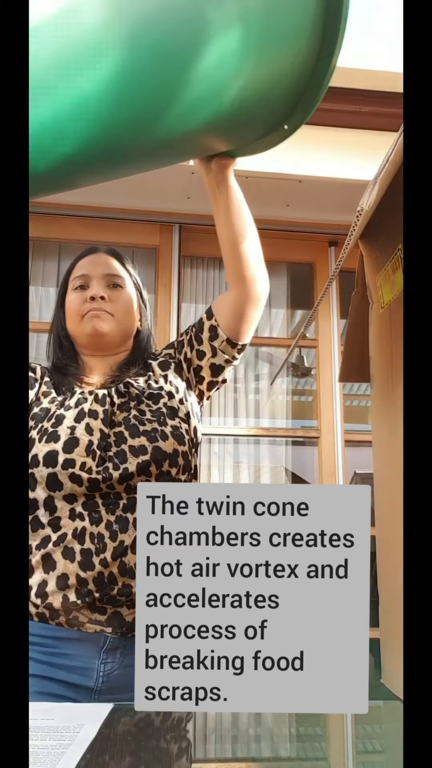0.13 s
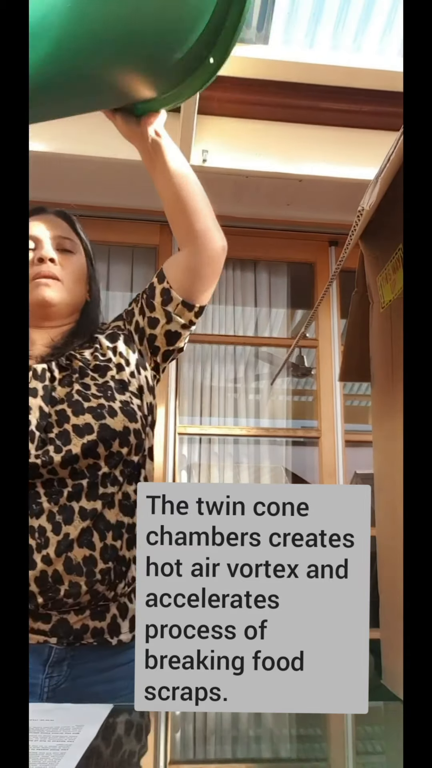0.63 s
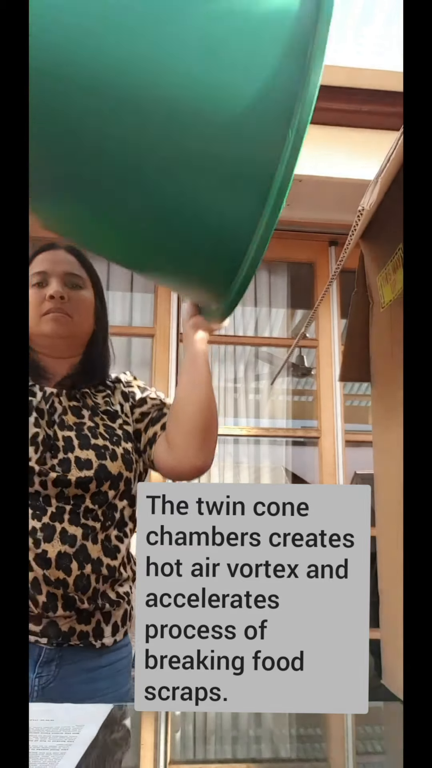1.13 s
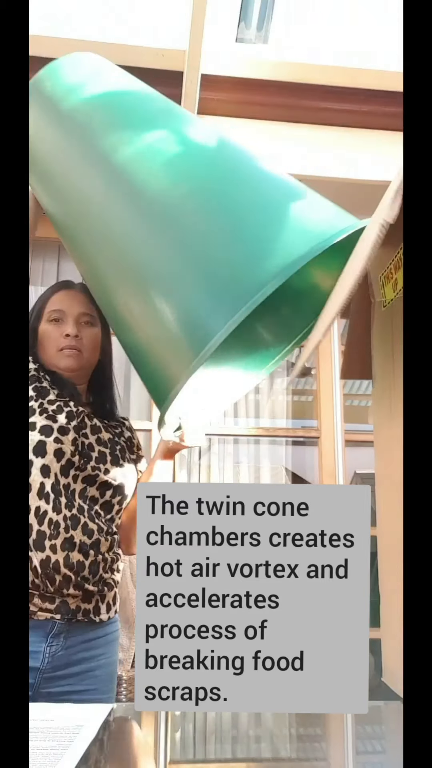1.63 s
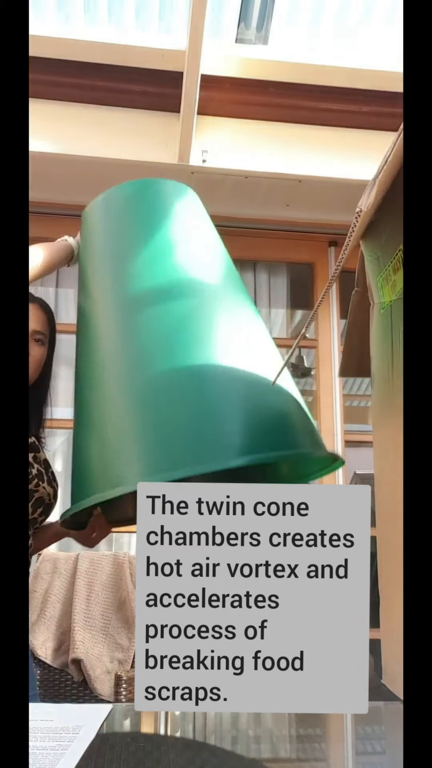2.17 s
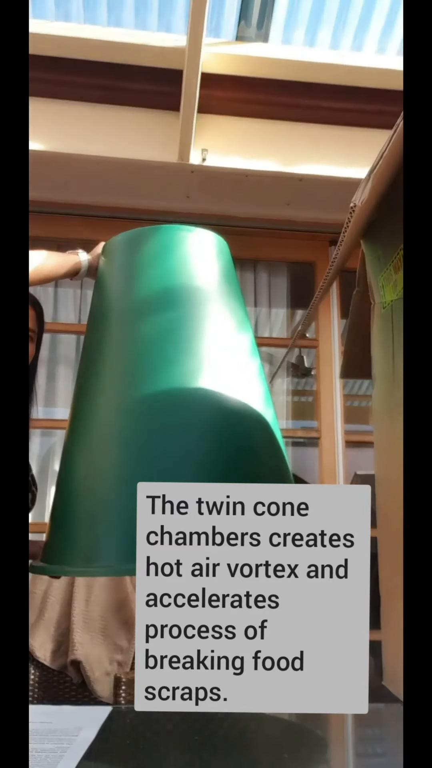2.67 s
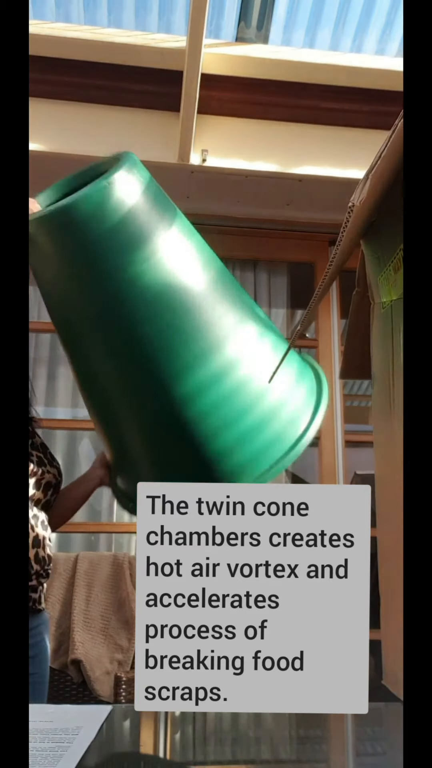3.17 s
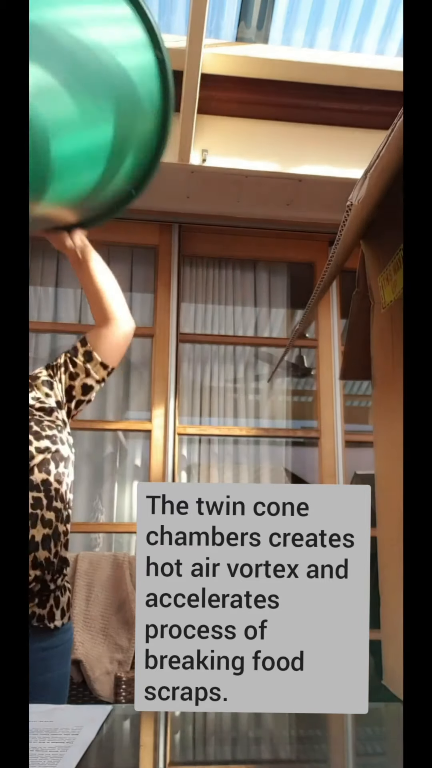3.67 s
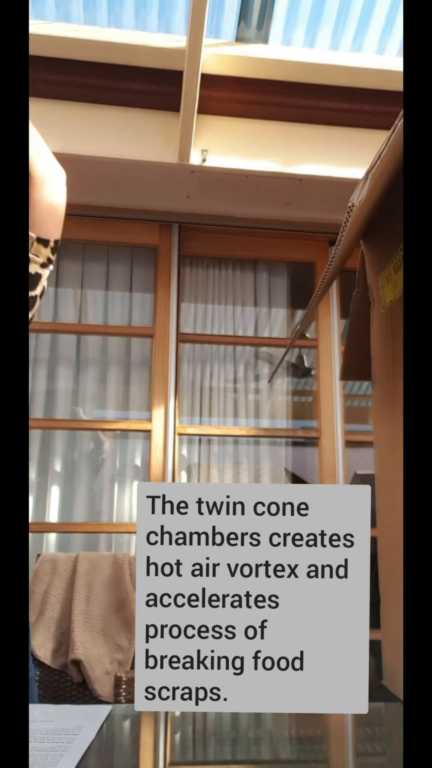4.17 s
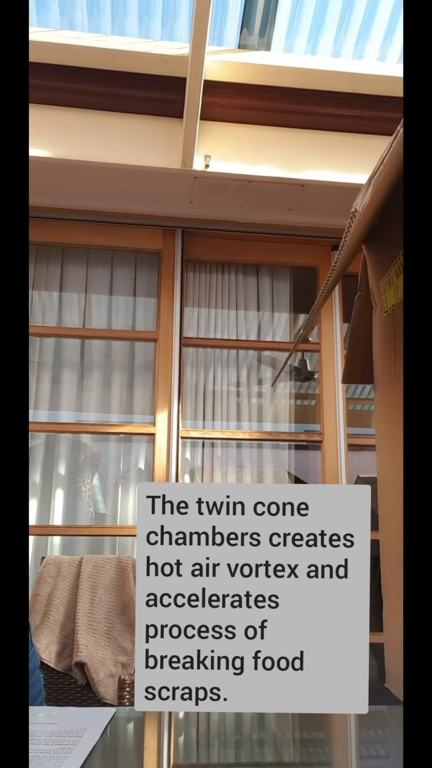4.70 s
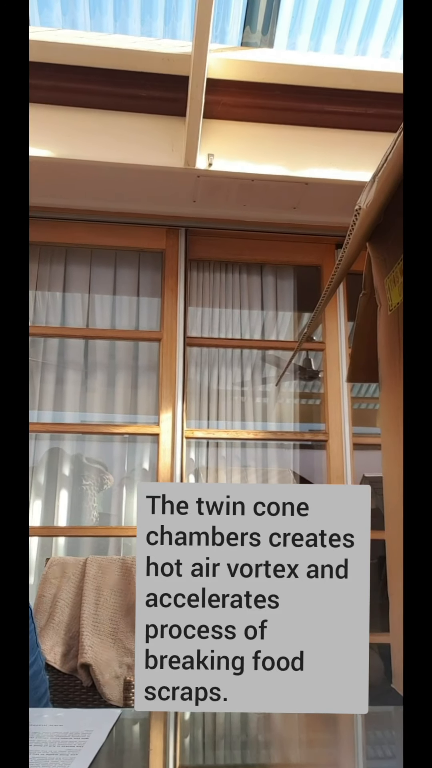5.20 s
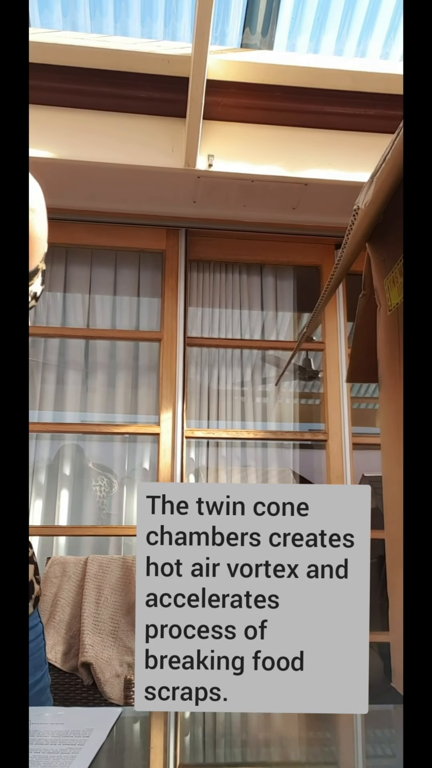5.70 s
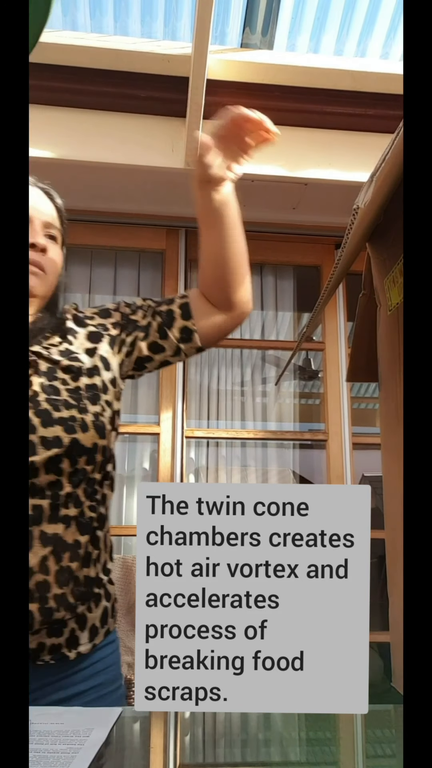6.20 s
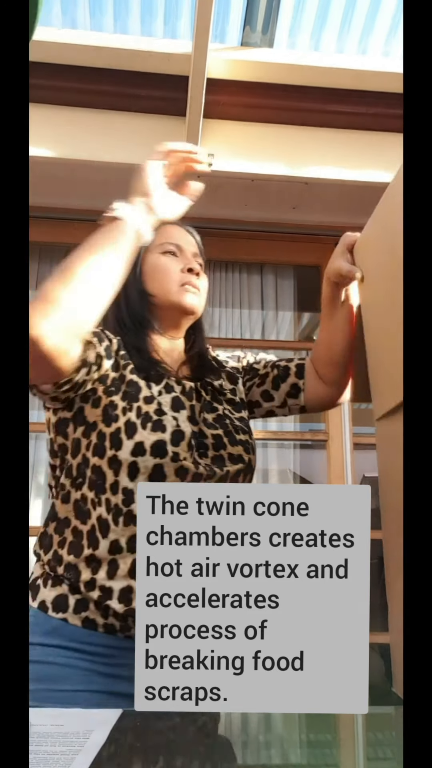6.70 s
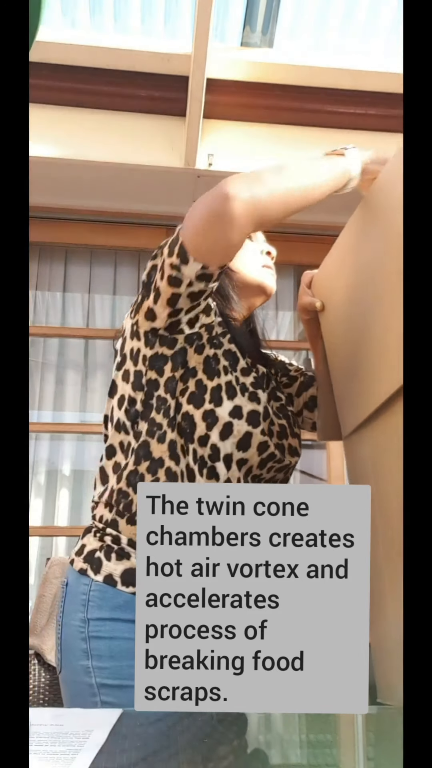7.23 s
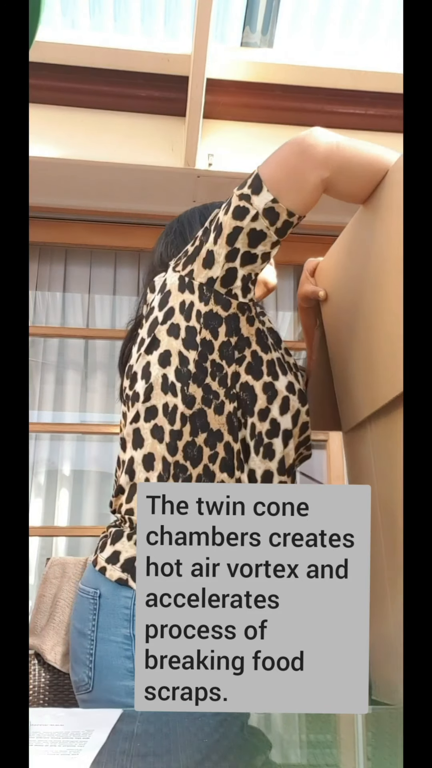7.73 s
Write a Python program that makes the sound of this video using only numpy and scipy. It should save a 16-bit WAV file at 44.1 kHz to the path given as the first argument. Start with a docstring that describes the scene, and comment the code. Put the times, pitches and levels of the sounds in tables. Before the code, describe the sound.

A covered porch, close stereo microphone, faint low air noise and a weak wavering hum. From 0 to 1.4 s there is only light rubbing and slight creaking of a large thin-walled plastic cone, with a tiny thump near 0.2. At 1.45 it strikes a cardboard box: a loud, short hollow crack with deep thuds until about 1.7. Around 1.9 to 2.1 its rim rasps dryly along a flap edge. Soft rustles and low flexing continue to 4 s. A lighter knock at 4.2 leads to a dense, loud clatter at 4.45 to 4.85, hollow and boomy, with a very faint skid; rocking knocks weaken through 5.4, with creaking. From 6 to 6.6 come small, quick taps and dull cardboard bumps, then gentle rustling, a firmer double thump near 7.3, and a faint last bump around 7.65. The echo is short.

```python
"""A large hollow plastic cone is swung about on a covered porch, bumps a cardboard box and drags along a flap edge;
later it is set down, rocks and skids briefly, then hands pull at the box flaps. Knocks and thumps are sums of
decaying wall modes, with noise for cracks and clatter; skin and cloth rub as filtered, uneven noise.
The porch answers the blows with decaying noise tails, air hisses and a low hum wavers beneath;
two spaced microphone ports listen."""
import sys
import numpy as np
from scipy import signal
from scipy.fft import rfft, irfft, next_fast_len
from scipy.io import wavfile
from scipy.ndimage import map_coordinates

SR = 44100
rng = np.random.default_rng(int(sys.argv[2]) if len(sys.argv) > 2 else 0)


def volts_from_db(level):
    """Convert decibel levels to linear amplitude ratios."""
    exponent = np.asarray(level, float) / 20
    return 10 ** exponent


def digitize_waveform(pressure):
    """Quantize a signal to 16-bit integers and store it at the path in sys.argv[1].

    Rows of a 2-D input are taken as channels; values are limited to [-1, 1].
    """
    field = np.atleast_2d(pressure).T
    bounded = np.clip(field, -1, 1)
    quanta = np.round(bounded * 32767).astype(np.int16)
    wavfile.write(sys.argv[1], SR, quanta)


N = 346203

# sharp knocks: start_s, peak_db, centre_hz (of the modes struck), crack_db
KNOCKS = [(1.45, -7.5, 775, -8), (1.749, -34, 1660, -54), (4.021, -35, 2050, -30.5), (4.234, -19, 807, -23),
          (4.45, -12, 654, -6.5), (4.458, -9, 650, -8.5), (4.504, -8.5, 627, -12), (4.524, -7.5, 796, -18),
          (4.618, -15, 620, -9.5), (4.631, -17, 650, -25), (4.788, -21.5, 910, -23),
          (4.806, -10, 713, -23.5), (4.998, -15, 760, -18), (5.181, -27, 880, -33),
          (5.298, -15.5, 810, -20), (5.418, -25, 790, -53.5), (5.799, -50.5, 2510, -55),
          (6.015, -27, 610, -26.5), (6.045, -23, 865, -29.5), (6.111, -29, 800, -55),
          (6.199, -40, 1890, -44), (6.22, -20.5, 934, -60), (6.265, -26.5, 900, -66),
          (6.348, -37, 740, -68), (6.365, -28.5, 820, -39.5), (6.4, -32, 870, -47), (6.414, -27, 710, -41),
          (6.449, -39, 2120, -29), (6.624, -32.5, 745, -40), (7.034, -29, 575, -48),
          (7.275, -29.5, 744, -43), (7.293, -17.5, 485, -27), (7.384, -29.5, 820, -46),
          (7.664, -38.5, 684, -53)]
# soft thumps that flex a whole wall: start_s, peak_db, centre_hz, t60_s (at the centre)
THUMPS = [(0.21, -37.5, 180, 0.35), (1.465, -10.5, 59.7, 0.056), (1.496, -12, 115.4, 0.092),
          (1.608, -22, 78.1, 0.12), (1.655, -16, 64, 0.25), (1.685, -32, 116.4, 0.14),
          (1.856, -28.5, 126, 0.37), (2.095, -32.5, 113, 0.64), (4.456, -7.5, 118.3, 0.087),
          (4.508, -15.5, 190, 0.28), (4.623, -9, 66, 0.053), (4.807, -5, 223, 0.12),
          (4.836, -15.5, 274, 0.12), (4.861, -29, 200, 0.18), (4.875, -46, 295, 0.12),
          (5.124, -22.5, 81.5, 0.46), (5.218, -28, 96, 0.24), (5.241, -27, 109.3, 0.068),
          (5.289, -20.5, 81, 0.066), (5.649, -37, 61.9, 0.089), (5.906, -37, 160, 0.48),
          (6.018, -28, 139, 0.085), (6.067, -28, 145, 0.12), (6.143, -23.5, 157, 0.16),
          (6.219, -24.5, 138.3, 0.054), (6.298, -39, 116, 0.083), (6.448, -27, 99, 0.1),
          (6.488, -33, 340, 0.069), (6.531, -32.5, 96, 0.15), (6.945, -46, 190, .08),
          (6.971, -27.5, 133, 0.2), (7.04, -27, 170, 0.11), (7.201, -36, 106, 0.2),
          (7.293, -17.5, 122, 0.079), (7.315, -16.5, 132, 0.087), (7.352, -22, 154, 0.062),
          (7.635, -34.5, 89, 0.072)]
# modes of the thin walls: mode_hz, level_db
WALL_MODES = [(62, 12), (83, 7.5), (104, 6.5), (128, 6), (165, 5.5), (185, 3.5), (256, 8.5), (300, -3),
              (405, 12), (495, -3), (605, -2), (670, -8), (740, -6), (825, -0.5), (920, -5), (1020, -3),
              (1200, 4.5), (1690, -12), (1870, 10.5), (2510, 2.5)]


def unit(x):
    """Normalizes the mean power: scaled to rms 1."""
    return x / np.sqrt(np.mean(x ** 2) + 1e-20)


def along(points, hz):
    """Spectral interpolation: (Hz, value) points read on a logarithmic frequency axis."""
    f, value = np.transpose(points)
    return np.interp(np.log(hz + 1), np.log(f + 1), value)


def envelope(rows):
    """Amplitude envelope from (s, dB) points joined by straight lines in dB; silent outside them."""
    s, db = np.transpose(rows)
    return volts_from_db(np.interp(np.arange(N) / SR, s, db, -120, -120))


def wobble(rate):
    """Band-limited random modulation: a spline through random knots, rate (at most 120) a second."""
    knots = rng.standard_normal(int(N * 120 / SR) + 4)
    return map_coordinates(knots, [np.arange(N) * min(rate, 120) / SR])


def filtered(x, response):
    """Linear filtering: the spectrum of x times a complex response of frequency."""
    size = next_fast_len(x.shape[-1] + 8192)
    spectrum = rfft(x, size) * response(np.fft.rfftfreq(size, 1 / SR))
    return irfft(spectrum, size)[..., :x.shape[-1]]


def resonant(peaks):
    """Parallel second-order resonators of alternating sign, from (Hz, width Hz, dB) peaks."""
    def response(f):
        total = 0
        for k, (centre, width, db) in enumerate(peaks):
            damping = 1j * f * width
            total = total + (-1) ** k * volts_from_db(db) * damping / (centre ** 2 - f ** 2 + damping)
        return total
    return response


def spaced(pair):
    """Spatial coherence: two unrelated signals mixed so that the ports agree in the bass, differ in the treble."""
    # likeness of left and right: freq_hz, correlation
    likeness = [(60, .85), (250, .82), (550, .65), (1200, 0)]

    def mid_and_side(hz):
        angle = np.arccos(np.clip(along(likeness, hz), 0, 1)) / 2
        return np.array([np.cos(angle), np.sin(angle)])
    mid, side = filtered(pair, mid_and_side)
    return np.array([mid + side, mid - side])


def friction(response, grain_db, rate):
    """Stick-slip excitation: noise in uneven slips, coloured by what it shakes; stereo, rms 1."""
    slips = volts_from_db(grain_db * wobble(rate)) * rng.standard_normal((2, N))
    return unit(spaced(filtered(slips, response)))


def swells(s, swell, fade, db):
    """Incoherent power sum of events that rise to their loudest moment and fall, steadily in dB."""
    span_db = 20  # what a swell rises and a fade falls in its time
    step = 32  # samples between computed gains
    t = np.arange(0, N + step, step) / SR - np.asarray(s)[:, None]
    slope = np.where(t < 0, -t / swell[:, None], t / fade[:, None])
    power = np.sum(volts_from_db(np.asarray(db)[:, None] - span_db * slope) ** 2, axis=0)
    return np.interp(np.arange(N), np.arange(0, N + step, step), np.sqrt(power))


def after(s, db, t60):
    """Exponential decay of what blows set going: a quick start and a slow dying."""
    fade = t60 * 20 / 60  # time to fall 20 dB
    return swells(s + 0.011, np.full(len(s), 0.012), np.full(len(s), fade), db)


def ring(db, centre_hz, t60, octaves, attack, chance):
    """Modal synthesis: a blow excites the modes near its centre; higher ones die sooner, differ in port phase."""
    hz, level = np.transpose(WALL_MODES)[:, :, None]
    t = np.arange(SR // 3) / SR
    nearness = np.exp(-0.5 * (np.log2(hz / centre_hz) / octaves) ** 2)
    reach = nearness * volts_from_db(level + 4.9 * chance[0])
    skew = np.array([1, -1])[:, None, None] * chance[1] * np.clip(hz / 1500, 0, 1) ** 2
    fade = volts_from_db(-60 * t / t60 * (hz / centre_hz) ** 0.22)
    mode_hz = hz * (1 + 0.0022 * chance[2])
    modes = reach * fade * np.sin(2 * np.pi * mode_hz * t + skew + 0.5 * chance[3])
    body = modes.sum(axis=1) * (1 - np.exp(-t / attack)) ** 2
    return volts_from_db(db) * body / np.abs(body).max()


def knocks():
    """Hard impact: brief contact gives a short ring of neighbouring modes and a broadband crack."""
    # colour of the crack, relative: freq_hz, level_db
    crack_colour = [(710, -6.5), (1200, 3), (2570, -2), (3600, -9), (9000, -12.5), (13000, -11.5),
                    (16500, -16)]
    out, bright = np.zeros((2, N + SR)), np.zeros((2, N + SR))
    t = np.arange(SR // 3) / SR
    crack_fade = volts_from_db(-60 * t / 0.015) + 0.16 * volts_from_db(-60 * t / 0.09)  # a fast and a slow part
    crack_shape = crack_fade * (1 - np.exp(-t / 0.001))
    chance = rng.standard_normal((len(KNOCKS), 4, len(WALL_MODES), 1))
    for (s, db, hz, crack_db), luck in zip(KNOCKS, chance):
        at = slice(round(s * SR), round(s * SR) + len(t))
        out[:, at] += ring(db, hz, t60=0.04, octaves=0.28, attack=0.0009, chance=luck)
        bright[:, at] += volts_from_db(crack_db) * crack_shape
    noise = unit(filtered(rng.standard_normal((2, N)), lambda f: volts_from_db(along(crack_colour, f))))
    return out[:, :N] + bright[:, :N] * noise


def thumps():
    """Soft impact: broad contact favours low modes; strong or higher-pitched thumps make the walls clatter more."""
    clatter_db, clatter_db_per_octave = -19, 5.5  # against the thump at 200 Hz; rise with its centre
    out, shake = np.zeros((2, N + SR)), np.zeros(N + SR)
    t = np.arange(SR // 3) / SR
    chance = rng.standard_normal((len(THUMPS), 4, len(WALL_MODES), 1))
    for (s, db, hz, t60), luck in zip(THUMPS, chance):
        at = slice(round(s * SR), round(s * SR) + len(t))
        out[:, at] += ring(db, hz, t60, octaves=0.42, attack=0.0016, chance=luck)
        shake_db = db + clatter_db + clatter_db_per_octave * np.log2(hz / 200)
        shake[at] += volts_from_db(shake_db - 60 * t / 0.22) * (1 - np.exp(-t / 0.003))
    clatter = friction(resonant([(700, 800, 0), (2200, 2000, -1)]), grain_db=3.5, rate=110)
    return out[:, :N] + shake[:N] * clatter


def rubbing():
    """Sliding friction: skin and cloth excite a rustle with a fine top; cracks leave the walls rustling on."""
    # strokes on the outer wall: loudest_s, swell_s, fade_s, rustle_db, top_db (against the rustle)
    strokes = [(0.204, 0.59, 0.18, -46.5, 4.5), (0.73, 0.23, 0.29, -55.5, -1),
               (1.069, 0.061, 0.11, -55.5, -1.5), (1.85, 0.43, 0.22, -49.5, -1.5),
               (1.921, .012, 0.26, -38, -4), (1.965, 0.062, 0.074, -34, -2), (2.097, 0.013, 0.053, -41, 7),
               (2.328, 0.28, 0.11, -55, 3), (2.585, 0.03, 0.14, -43.5, -2.5),
               (2.709, 0.11, 0.12, -37.5, -6), (3.518, 0.27, 0.38, -48.5, 2.5),
               (3.87, 0.047, 0.19, -42, -2), (4.029, 0.19, 0.16, -44, 2.5), (4.338, 0.19, 0.49, -44.5, 14),
               (4.84, 0.05, 0.6, -46, 1), (5.179, 0.11, 0.1, -43.5, -2), (5.96, .2, 0.4, -57, 3.5),
               (6.5, 0.1, 0.11, -53.5, 4.5), (6.7, 0.16, 0.62, -49, 0), (7.122, 0.18, 0.069, -43, 0),
               (7.298, 0.058, 0.14, -45.5, -4), (7.42, 0.12, 0.16, -44.5, -3),
               (7.7, 0.13, 0.28, -56.5, 0.5)]
    # colour of the rustle, relative: freq_hz, level_db
    rustle_colour = [(500, -33.5), (1000, -6), (2400, -3.5), (3500, -9.5), (6500, -7.5), (9000, -17),
                     (11500, -26)]
    # colour of the fine top, relative: freq_hz, level_db
    fine_colour = [(6000, -17), (9000, -12), (11000, -4), (14500, -4)]
    at_rest_db = -79  # hands merely holding
    shiver_db, shiver_t60_s = -20, 0.4  # rustle after a crack, against the crack
    shiver_top_db, shiver_top_t60_s = -27.5, 0.33
    s, swell, fade, rustle_db, top_db = np.transpose(strokes)
    knock_s, crack_db = np.transpose(KNOCKS)[[0, 3]]
    rustling = volts_from_db(at_rest_db) + swells(s, swell, fade, rustle_db)
    rustling += after(knock_s, crack_db + shiver_db, shiver_t60_s)
    hissing = swells(s, swell, fade, rustle_db + top_db)
    hissing += after(knock_s, crack_db + shiver_top_db, shiver_top_t60_s)
    rustle = rustling * friction(lambda f: volts_from_db(along(rustle_colour, f)), grain_db=2, rate=45)
    fine = hissing * friction(lambda f: volts_from_db(along(fine_colour, f)), grain_db=1.5, rate=45)
    return rustle + fine


def gripping():
    """Forced flexure: grips bend the walls, which creak in mid modes and boom in low ones; thumps flex them on."""
    # grips: loudest_s, swell_s, fade_s, creak_db, boom_db
    grips = [(0.02, 1.1, 0.4, -48.5, -57), (0.23, .03, 0.17, -44.5, -73), (0.59, 0.052, 0.12, -48.5, -73),
             (0.82, 0.2, 0.16, -48.5, -69), (2.1, 0.41, 0.22, -44, -44.5), (2.7, 0.099, 0.1, -51, -54.5),
             (3.55, 0.24, 2.4, -58.5, -69.5), (5.351, 1.4, 0.22, -39.5, -38.5),
             (5.95, 0.035, 1.3, -45, -54.5), (7.05, 1.5, 0.35, -54.5, -46.5),
             (7.66, 0.16, 1.1, -55.5, -42.5)]
    # creak resonances: centre_hz, width_hz, level_db
    creak_peaks = [(616, 290, -1), (795.4, 100, 5), (940, 510, -3.5)]
    # boom resonances: centre_hz, width_hz, level_db
    boom_peaks = [(53.3, 13.4, 5), (132, 46, -0.5), (197, 45, -6), (292, 260, -8)]
    at_rest_db = -73.5  # boom of hands merely holding
    shudder_db, shudder_creak_db, shudder_t60_s = -12, -23, 0.58  # flexing after a thump, against the thump
    s, swell, fade, creak_db, boom_db = np.transpose(grips)
    thump_s, thump_db = np.transpose(THUMPS)[:2]
    creaking = swells(s, swell, fade, creak_db)
    creaking += after(thump_s, thump_db + shudder_creak_db, shudder_t60_s)
    booming = volts_from_db(at_rest_db) + swells(s, swell, fade, boom_db)
    booming += after(thump_s, thump_db + shudder_db, shudder_t60_s)
    creak = creaking * friction(lambda f: resonant(creak_peaks)(f) ** 2, grain_db=3, rate=70)
    boom = booming * friction(lambda f: resonant(boom_peaks)(f) / (1 + (f / 400) ** 4), grain_db=1, rate=18)
    return creak + boom


def drag():
    """Stick-slip on an edge: the rim rasps along corrugated card, exciting its resonances."""
    # loudness of the rasp: time_s, level_db
    rasp_level = [(1.914, -56), (1.917, -32), (1.97, -28.5), (2.02, -38), (2.1, -44), (2.2, -59)]
    # resonances of the edge: centre_hz, width_hz, level_db
    edge_peaks = [(2570, 300, -4), (1750, 160, -15), (475, 13, 0), (810, 51, -8)]
    rasp = friction(lambda f: resonant(edge_peaks)(f) / (1 + (f / 3500) ** 4), grain_db=3.5, rate=110)
    return envelope(rasp_level) * rasp


def skid():
    """Friction-driven resonance: the rim sings in two narrow bands as it skids to rest on the floor."""
    # loudness of the skid: time_s, level_db
    skid_level = [(4.65, -44), (4.775, -42), (4.79, -54)]
    rim = resonant([(1700, 60, 0), (3000, 130, -3)])
    return envelope(skid_level) * friction(lambda f: rim(f) ** 2, grain_db=2.5, rate=40)


def porch(x):
    """Reverberation: convolution with noise that decays by frequency, drawn anew as things move."""
    # reverberation time: freq_hz, t60_s
    reverb_time = [(100, 0.33), (1000, 0.4), (4000, 0.3), (12000, 0.1)]
    step, delay = SR // 4, 250  # samples: life of one answer, and its lateness
    out = np.zeros((2, N + SR))
    for start in range(0, N, step):
        hz, t, z = signal.stft(rng.standard_normal((2, SR // 2)), SR, nperseg=256)
        decay = volts_from_db(-60 * t / along(reverb_time, hz)[:, None])
        tail = signal.istft(z * decay, SR, nperseg=256)[1]
        wet = signal.fftconvolve(x[:, start:start + step], tail / np.linalg.norm(tail[0]), axes=1)
        out[:, start + delay:start + delay + wet.shape[1]] += wet
    return out[:, :N]


def porch_hum():
    """Frequency and amplitude modulation: a low tone wavers in pitch and level, with a faint octave."""
    # loudness of the hum before its wavering: time_s, level_db
    hum_level = [(0, -64.5), (2.9, -56), (3.75, -50), (4.1, -54.5), (7.85, -75.5)]
    phase = np.cumsum(2 * np.pi * (126 + 3 * wobble(15)) / SR)
    tone = np.sin(phase) + volts_from_db(-15) * np.sin(2 * phase)
    return envelope(hum_level) * volts_from_db(3 * wobble(7)) * tone


def porch_air():
    """Broadband background noise: the quiet of the porch, shaped by frequency and slowly uneven."""
    # colour of the air, relative: freq_hz, level_db
    air_colour = [(25, 12.5), (117, 12), (260, 6.5), (349, 1.5), (755, 8.5), (1510, -12.5), (3440, -36.5),
                  (6520, -35), (14500, -46)]
    return volts_from_db(-57.5) * friction(lambda f: volts_from_db(along(air_colour, f)), grain_db=5.5, rate=3.23)


def scene():
    """Superposition: blows with their echo, over friction, hum and air."""
    blows = knocks() + thumps()
    echo = volts_from_db(-14) * spaced(porch(blows))
    return blows + echo + rubbing() + gripping() + drag() + skid() + porch_hum() + porch_air()


def top_cut(x):
    """Nothing passes above the cut-off."""
    return signal.sosfilt(signal.butter(12, 15830, fs=SR, output="sos"), x)


def record(dry):
    """Interaural-like differences: left hears 0.18 ms sooner, right more treble; band ends fall, peaks round."""
    # left minus right level: freq_hz, level_db
    lean = [(60, 0.5), (800, -2), (2500, -7.5), (12000, -4.5)]

    def port_response(f):
        balance = volts_from_db(np.outer([0.5, -0.5], along(lean, f)))
        lead = np.exp(np.outer([1j, -1j], np.pi * f * 0.00018))
        low_cut = f ** 4 / (f ** 4 + 46 ** 4)
        high_cut = np.where(f > 14600, volts_from_db(-32), 1)
        return balance * lead * low_cut * high_cut
    ports = filtered(dry, port_response)
    ports = ports / (1 + np.abs(ports / 0.9) ** 6) ** (1 / 6)  # soft limit at 0.9
    return top_cut(ports)


dry = scene()
out = record(dry)
digitize_waveform(out)
```